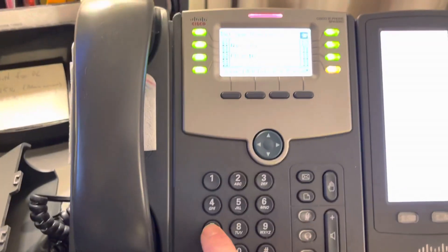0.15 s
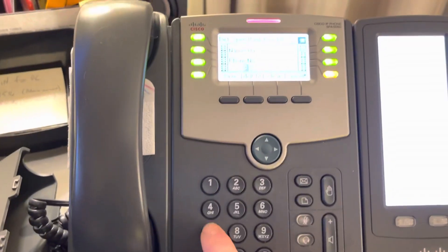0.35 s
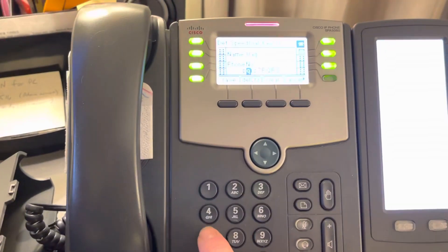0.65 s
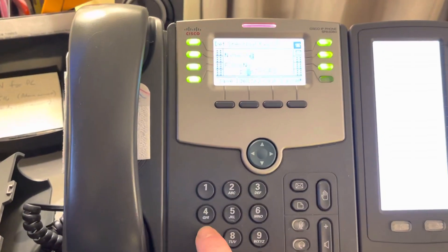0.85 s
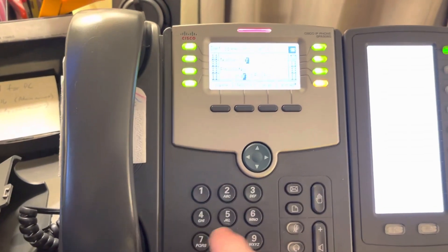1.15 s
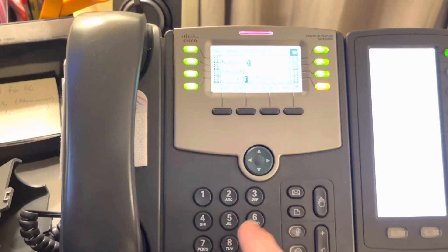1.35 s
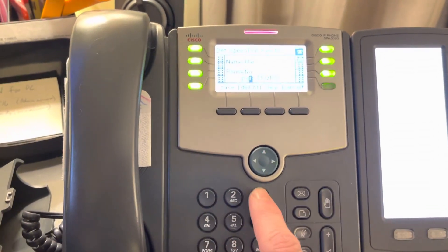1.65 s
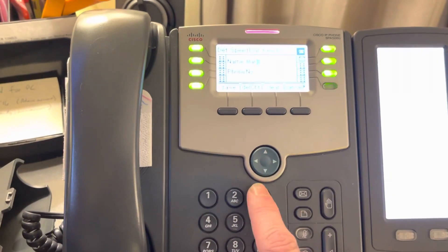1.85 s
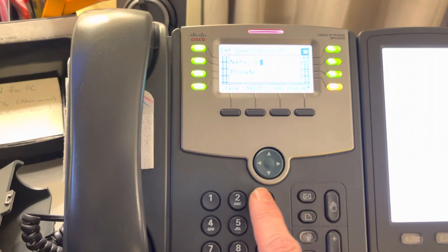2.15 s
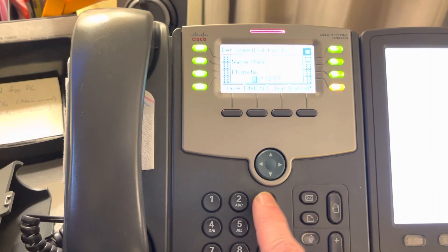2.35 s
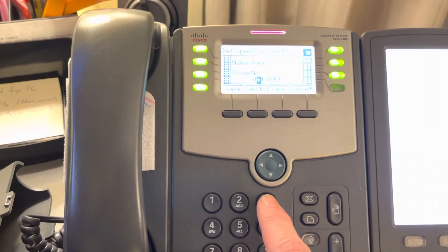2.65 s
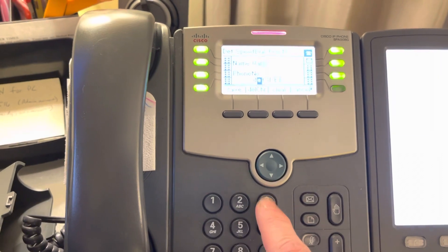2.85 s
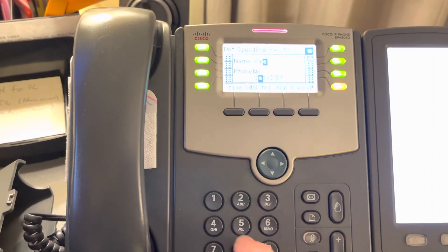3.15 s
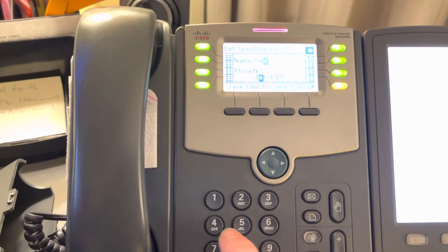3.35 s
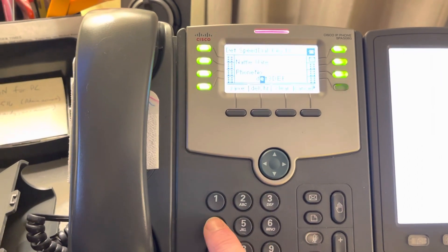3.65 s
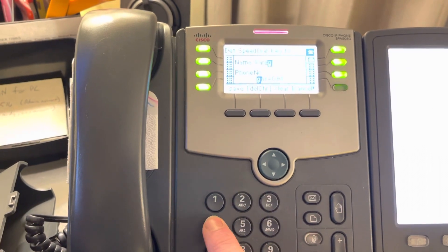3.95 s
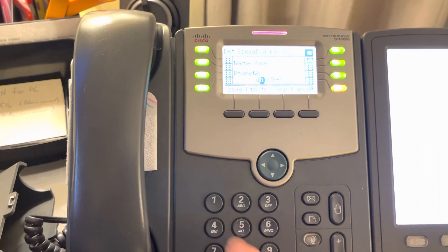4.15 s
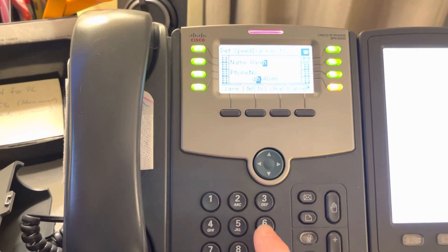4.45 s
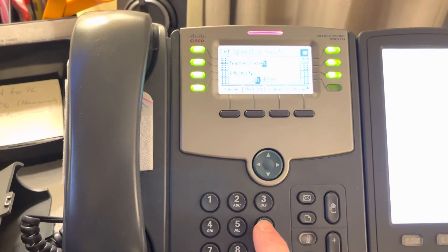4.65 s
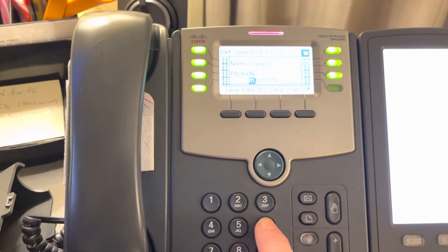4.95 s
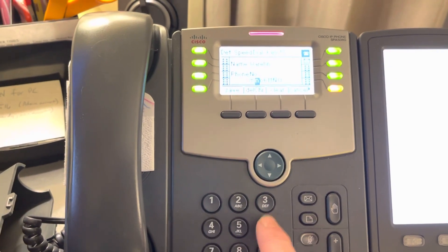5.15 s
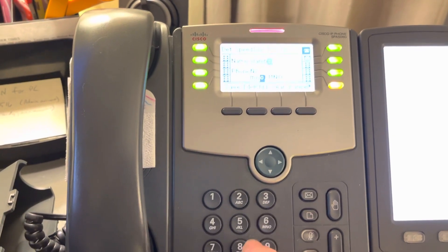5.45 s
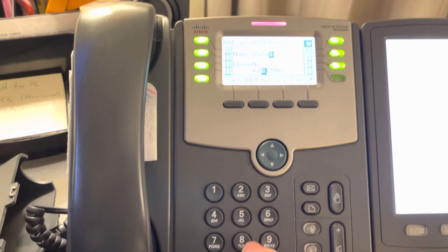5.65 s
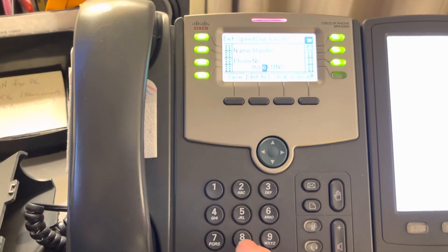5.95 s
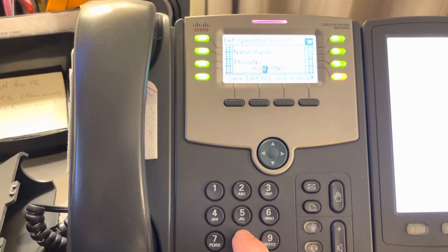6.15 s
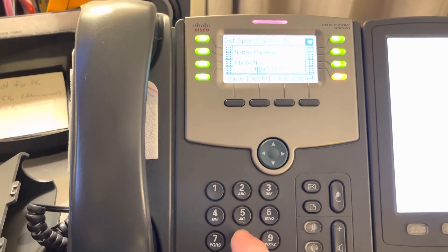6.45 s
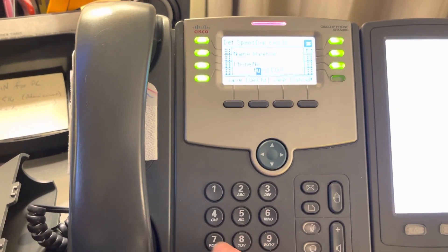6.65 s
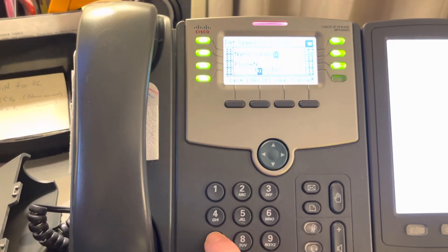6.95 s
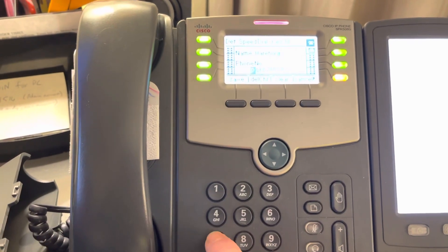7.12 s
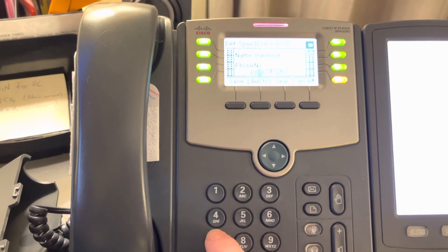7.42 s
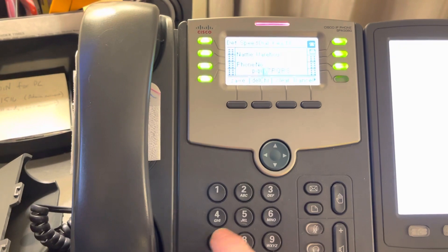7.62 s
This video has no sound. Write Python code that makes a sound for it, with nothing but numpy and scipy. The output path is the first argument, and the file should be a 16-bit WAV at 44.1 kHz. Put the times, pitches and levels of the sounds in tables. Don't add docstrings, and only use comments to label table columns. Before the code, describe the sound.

A finger presses plastic desk phone keys in uneven quick runs, each a dull knock then a brighter springy click, over faint low hum.

```python
import sys
import numpy as np
from scipy import signal
from scipy.fft import rfft, irfft, next_fast_len
from scipy.io import wavfile
from scipy.ndimage import uniform_filter1d

SR = 44100
rng = np.random.default_rng(int(sys.argv[2]) if len(sys.argv) > 2 else 0)


def master(y):
    cut = np.clip(np.atleast_2d(y).T, -1, 1)
    pcm = np.round(cut * 32767)
    wavfile.write(sys.argv[1], SR, pcm.astype(np.int16))


def nominal_scale(level):
    x = np.asarray(level, float) / 20
    return 10 ** x


N = 343098

# frequency in Hz, lead of the left port in radians.
PORT_PHASE = [(300, 0.5), (2400, 0.926), (8300, 0.59), (9600, -2.05), (10200, -3), (10800, -4.5),
              (11700, -5), (13000, -6)]


def unit(x):
    return x / np.sqrt(np.mean(x ** 2) + 1e-20)


def along(points, hz):
    f, v = np.transpose(points)
    return np.interp(np.log(hz + 1), np.log(f + 1), v)


def curve(rows):
    return np.interp(np.arange(N) / SR, *np.transpose(rows), left=-150, right=-150)


def filtered(x, response):
    m = next_fast_len(x.shape[-1] + 1024)
    spectrum = rfft(x, m) * response(np.fft.rfftfreq(m, 1 / SR))
    return irfft(spectrum, m)[..., :x.shape[-1]]


def colored(x, points):
    return filtered(x, lambda hz: nominal_scale(along(points, hz)))


def rung(x, modes):
    def response(f):
        return sum((-1) ** k * nominal_scale(db) * 1j * f * w / (c * c - f * f + 1j * f * w)
                   for k, (c, w, db) in enumerate(modes))

    y = filtered(x, response)
    return y / (np.abs(y).max() + 1e-20)


def patchy(depth_db, channels):
    z = signal.stft(rng.standard_normal((channels, N + 512)), nperseg=512)[2]
    field = uniform_filter1d(rng.standard_normal(z.shape[1:]), size=5, axis=0)
    field = uniform_filter1d(field, size=12, axis=1)
    return signal.istft(z * nominal_scale(depth_db * unit(field)), nperseg=512)[1][:, :N]


def presses():
    # start in seconds, key body in dB, case knock in dB, snap in dB, key body pitch in Hz.
    pressed = [(0.0802, -38.5, -50.5, -53, 1150), (0.3319, -39, -61, -50, 1280),
               (0.618, -36.5, -45, -58.5, 1170), (1.9581, -34.5, -58, -52.5, 850),
               (2.1913, -33.5, -34, -56.5, 920), (3.624, -37.5, -44.5, -54.5, 1120),
               (3.816, -33, -44, -46, 1700), (4.6373, -50, -57, -90, 1720), (4.8948, -32.5, -38, -46, 1280),
               (5.1009, -31.5, -38.5, -42.5, 1250), (6.0492, -44.5, -48, -71, 1040),
               (6.2408, -32, -72, -30, 1070), (6.8301, -35, -68, -37, 1210), (7.025, -35, -59, -43, 1210),
               (7.2155, -35, -52, -35, 1210), (7.4007, -36, -60, -33, 1150)]
    rattle_ms = 2.5
    settle_s, settle_db, settle_snap_db = 0.009, -12.5, -18
    rows = []
    for s, key_db, knock_db, snap_db, hz in pressed:
        rows.append((s, key_db, knock_db, snap_db, hz, rattle_ms))
        rows.append((s + settle_s, key_db + settle_db, knock_db + settle_db,
                     snap_db + settle_db + settle_snap_db, hz, rattle_ms))
    return rows


def releases():
    # start in seconds, key body in dB, snap in dB, rebound delay in ms, rebound over first in dB.
    released = [(0.2018, -41.5, -37.5, 2.3, 4), (0.4493, -34, -32, 7.8, -4), (0.7634, -36.5, -36, 8.2, -5),
                (2.0843, -33.5, -33, 1.3, -15), (2.327, -33, -32.5, 2.53, -2), (3.725, -35.5, -38, 4, -6),
                (3.944, -31, -24.5, 3.4, -7), (4.8018, -37, -32.5, 1.33, 7), (4.9921, -41, -38, 5, 2),
                (5.2091, -31.5, -25, 5.1, -4.8), (6.171, -35.5, -32.5, 5.5, -7),
                (6.3532, -29.5, -28, 7.7, -11.5), (6.9357, -35.5, -31.5, 4.8, -1.5),
                (7.1153, -31, -31, 5.8, -3.5), (7.304, -33.5, -32.5, 4.8, 0.8), (7.5119, -32, -27.5, 7, -3)]
    # from this second, release pitch in Hz, case knock over key body in dB,
    # rattle length in ms.
    caps = [(0, 3700, -32, 1.6), (.4, 3500, -28, 1.4), (.7, 2300, -26, 1.3), (1.9, 2580, -20, 2),
            (2.3, 2280, -11.5, 1.4), (3.5, 3500, -40, 2.2), (3.9, 2900, -27, 1.9), (4.6, 2110, -23, 2.2),
            (4.9, 2050, -20, 2.3), (5.2, 2080, -15.5, 1.6), (6.0, 3100, -37, 1.7), (6.3, 2140, -40, 1.15),
            (6.8, 3560, -42, 1.3), (7.5, 3230, -40, 1.7)]
    rebound_longer, rebound_body_db = 1.45, -1.5
    rows = []
    for s, key_db, snap_db, delay_ms, more_db in released:
        hz, knock_db, rattle_ms = [cap[1:] for cap in caps if cap[0] <= s][-1]
        again_db = key_db + more_db + rebound_body_db
        rows.append((s, key_db, key_db + knock_db, snap_db, hz, rattle_ms))
        rows.append((s + delay_ms / 1000, again_db, again_db + knock_db, snap_db + more_db,
                     hz, rattle_ms * rebound_longer))
    return rows


def rocks():
    # start in seconds, key body in dB, snap in dB, key body pitch in Hz.
    rocked = [(0.335, -48, -51, 2330), (0.6135, -42, -45, 2350), (0.6278, -51, -50, 1070),
              (3.8197, -40, -43.5, 1980), (3.952, -50, -57, 1170), (4.7884, -58, -87, 3000),
              (4.815, -49, -66, 2650), (4.8857, -44, -49.5, 870), (4.9888, -43, -56, 2050),
              (5.0928, -49, -52, 2520), (5.201, -52, -66, 1810), (6.0282, -53.5, -78, 2310),
              (6.03, -57, -70, 850), (6.1665, -51, -60, 1330), (6.2345, -41.5, -40.5, 2720),
              (6.8226, -53, -59, 1100), (7.018, -56, -59, 1030), (7.0284, -38, -32, 2530),
              (7.209, -52, -64, 1500), (7.398, -34, -54, 1990), (7.504, -53.5, -63, 1170)]
    knock_db, rattle_ms = -20.5, 2.6
    return [(s, key_db, key_db + knock_db, snap_db, hz, rattle_ms) for s, key_db, snap_db, hz in rocked]


def shoves():
    # start in seconds, case knock in dB, key body in dB.
    shoved = [
        (0.646, -41, -48),
        (1.9597, -35, -47),
        (3.8197, -43, -54),
        (4.6703, -48.5, -52.5),
        (5.1198, -30, -37.5),
        (5.1752, -41.5, -51),
        (6.249, -50, -62),
        (6.3183, -52, -52.5),
        (6.8383, -51.5, -53),
    ]
    hz, rattle_ms, snap_db = 1030, 4.5, -22
    return [(s, key_db, knock_db, key_db + snap_db, hz, rattle_ms) for s, knock_db, key_db in shoved]


def touches():
    # start in seconds, key body in dB, snap in dB.
    touched = [(0.069, -62, -70), (0.187, -60, -77), (0.319, -54, -65), (1.6693, -58, -78),
               (1.749, -60, -65), (2.133, -52.5, -73), (3.546, -60, -72), (3.562, -56.5, -62.5),
               (3.899, -65, -77), (4.638, -57.5, -71), (4.6862, -68, -68.5), (6.041, -55, -64),
               (6.318, -64, -61)]
    hz, rattle_ms, knock_db = 2080, 3.4, -75.5
    return [(s, key_db, knock_db, snap_db, hz, rattle_ms) for s, key_db, snap_db in touched]


def keys():
    # centre in Hz, width in Hz, level in dB.
    case = [(387.4, 37, -3.5), (645, 200, -9.5)]
    plate = [(807, 120, -1.5), (1150, 900, 2), (1870, 430, 7), (2600, 1180, 1.5), (3914, 88, 5.5)]
    edge = [(4074, 1430, -0.5), (5190, 2200, 7.5), (6900, 6700, 4), (9140, 2200, 5), (10540, 860, 2.5)]
    out, t = np.zeros(N + SR), np.arange(1536) / SR
    knock = rung(np.exp(-.5 * ((t - .0009) / .0003) ** 2), case)
    contacts = presses() + releases() + rocks() + shoves() + touches()
    for s, key_db, knock_db, snap_db, hz, rattle_ms in contacts:
        firm = 1 / (1 + nominal_scale(-1.5 * (key_db + 48)))
        bright = np.clip(nominal_scale(snap_db - key_db), 0, 1)
        blow = np.exp(-.5 * ((t - .0003) / (.00007 - .00003 * bright)) ** 2)

        life_s = 0.0011 * np.clip(rattle_ms, .3, 9)
        onset = 1 - np.exp(-t / (.0001 + 0.00097 * (1 - firm)))
        fade = (np.exp(-t / life_s) + 0.11 * np.exp(-t / 0.0031)) * onset
        noise = rng.standard_normal((2, len(t)))
        chatter = noise * np.abs(noise[::-1]) * fade

        soft = filtered(chatter[0], lambda f: 1 / (1 + 1j * f / (0.99 * hz + 1500)) ** 2)
        body = [(hz, 0.19 * hz, -1)] + [(c, w, db - 4.2 * abs(np.log2(c / hz))) for c, w, db in plate]
        key = rung(firm * blow + (0.62 + 0.76 * bright) * soft, body)
        edges = [(c, w, db - 9 * (1 - bright) * np.log2(c / 4700)) for c, w, db in edge]
        snap = rung(chatter[1] + 1.96 * np.gradient(blow), edges)

        hit = nominal_scale(key_db + 4.5) * key + nominal_scale(knock_db + 2.0) * knock + nominal_scale(snap_db + 3.5) * snap
        out[round(s * SR) - 10:][:len(t)] += hit
    return out[:N]


def nail():
    # start in seconds, rim in dB, sheen in dB.
    flicks = [
        (0.6185, -44, -37),
        (3.9446, -46, -8),
        (4.804, -37, -50),
        (4.9979, -50, -22),
        (5.2091, -42, -20),
        (6.1712, -36, -50),
        (6.3545, -25, -13),
        (7.2155, -43, -12),
        (7.4, -44, -23),
        (7.5122, -44, -12),
    ]
    # frequency in Hz, time to fall 60 dB in seconds.
    rim = [(11000, 0.016), (15250, 0.0063)]
    out, t = np.zeros(N + SR), np.arange(1024) / SR
    for s, *levels_db in flicks:
        wave = 0
        for db, (hz, t60) in zip(levels_db, rim):
            wander = .1 * np.cumsum(rng.standard_normal(len(t)))
            wave = wave + nominal_scale(db - 60 * t / t60) * np.sin(2 * np.pi * hz * t + wander)
        out[round(s * SR):][:len(t)] += wave * (1 - np.exp(-t / .0003))
    return out[:N]


def brush():
    # start in seconds, hold in seconds, level in dB, lift-off in dB per second.
    strokes = [
        (1.366, 0.0071, -74.5, 900),
        (1.479, 0.11, -68, 400),
        (1.668, .003, -80, 1200),
        (1.695, 0.017, -69.5, 390),
        (1.966, .026, -79, 1000),
        (2.055, 0.02, -73, 2000),
        (2.195, 0.018, -75, 650),
        (2.293, 0.0045, -80, 400),
    ]
    # frequency in Hz, density in dB per Hz.
    skin = [(700, -17.5), (1000, 0.5), (1500, -11), (2800, -13.5), (4700, -14), (7000, -13.5), (8600, -10),
            (10500, -6.5), (12500, -33)]
    rise = 1040
    t = np.arange(N) / SR
    stroke = sum(nominal_scale(db - rise * np.maximum(s - t, 0) - fall * np.maximum(t - s - hold, 0))
                 for s, hold, db, fall in strokes)
    grit = patchy(1.2, channels=1)[0]
    return nominal_scale(7.5) * stroke * unit(colored(grit, skin))


def ports(x):
    # frequency in Hz, left minus right in dB.
    lean = [(300, -3), (1100, 4.5), (2000, 0.5), (3700, 3.5), (7000, 2), (12000, -1)]

    def half(hz):
        return nominal_scale(along(lean, hz) / 2) * np.exp(.5j * along(PORT_PHASE, hz))

    return np.array([filtered(x, half), filtered(x, lambda hz: 1 / half(hz))])


def office(x, wet_db):
    # frequency in Hz, time to fall 60 dB in seconds.
    decay = [(400, 0.23), (1300, 0.15), (3000, 0.13), (6000, 0.17), (10000, 0.17)]
    grid = dict(fs=SR, nperseg=256, noverlap=192)
    hz, t, z = signal.stft(np.roll(x, 300), **grid)
    keep = nominal_scale(-120 * t[1] / along(decay, hz))
    power = uniform_filter1d(np.abs(z) ** 2, size=5, axis=0)
    lingering = np.array([signal.lfilter([1 - k], [1, -k], p) for k, p in zip(keep, power)])
    noise = signal.stft(rng.standard_normal((2, N)), **grid)[2]
    tail = noise / np.std(noise) * np.sqrt(np.abs(lingering))
    left, other = signal.istft(tail, **grid)[1][:, :N]
    return nominal_scale(wet_db) * np.array([left, 0.66 * left + 0.21 * other])


def hum():
    # frequency in Hz, width in Hz, level in dB.
    duct = [(61.4, 17, -53), (220.4, 8.3, -64), (287, 12, -68), (739.7, 11, -75.5)]
    # frequency in Hz, left minus right in dB.
    lean = [(60, -0.5), (220, -5.5), (740, -10.5)]
    fan_hz, fan_db = 59.3, -48.5
    lines = nominal_scale(fan_db) * np.sin(2 * np.pi * fan_hz * np.arange(N) / SR)
    for hz, w, db in duct:
        line = filtered(rng.standard_normal(N), lambda f: np.exp(-((f - hz) / w) ** 2))
        lines = lines + nominal_scale(db) * unit(line)
    return filtered(np.array([lines, lines]), lambda f: nominal_scale(np.outer([.5, -.5], along(lean, f))))


def air(clicks):
    # frequency in Hz, density in dB per Hz.
    shared = [(15, -63.5), (25, -39.5), (40, -10.5), (64, -5), (92, -8), (220, -13.5), (422, -24.5),
              (546, -23), (694, -29.5), (756, -29), (796, -31), (1500, -46.5), (1950, -75.5), (3300, -120)]
    differing = [(15, -47.5), (25, -17), (49, -8.5), (189, -5.5), (220, -7), (575, -10), (694, -8.5),
                 (756, -11.5), (1500, -24), (1950, -52), (3300, -120)]
    vent = [(900, -4.5), (1500, -3), (2000, -4), (2700, -6), (3300, -13.5), (4200, -20), (6500, -24),
            (8500, -19.5), (10600, -24), (12500, -11.5)]
    # frequency in Hz, level in dB.
    apart = [(1200, 2.5), (2600, -11), (6000, -0.5), (9300, -14), (10200, -18), (12000, -14.5)]
    # time in seconds, level in dB.
    drift = [(0.0, -68), (1.5, -68.5), (2.6, -69.5), (5.5, -69), (7.78, -68.5)]
    echo_db, echo_s = -23.5, 0.049
    a, b, *rush = patchy(0.83, channels=5)
    mid = nominal_scale(-50) * unit(colored(a, shared))
    side = nominal_scale(-62) * unit(colored(b, differing))
    rumble = np.array([mid + side, mid - side]) * nominal_scale([[-.4], [.4]])

    rush = unit(colored(np.array(rush), vent))
    echo = np.abs(filtered(clicks ** 2, lambda f: 1 / (1 + 1j * np.pi * f * echo_s) ** 2))
    level = np.sqrt(nominal_scale(curve(drift) - 1.5) ** 2 + nominal_scale(echo_db) ** 2 * echo)
    return rumble + level * (ports(rush[0]) + colored(rush[1:], apart))


def scene():
    clicks = keys()
    close = clicks + nail()
    room = filtered(office(close, wet_db=-14),
                    lambda hz: np.exp(np.outer([.5j, -.5j], along(PORT_PHASE, hz))))
    return ports(close + brush()) + room + hum() + air(clicks)


def roll_off(x):
    return signal.sosfilt(signal.butter(12, 16500, fs=SR, output="sos"), x)


def record(dry):
    # frequency in Hz, level in dB.
    microphone = [(11300, -0.5), (12300, -22.5), (13800, -49), (15500, -46), (17000, -70)]
    return roll_off(colored(dry, microphone))


dry = scene()
out = record(dry)
master(out)
```